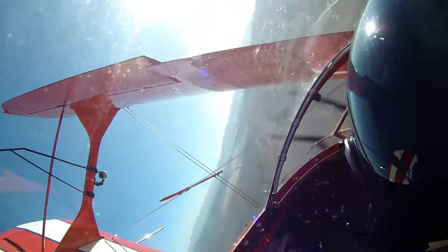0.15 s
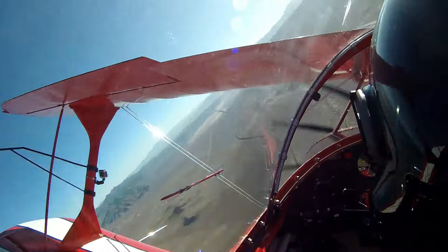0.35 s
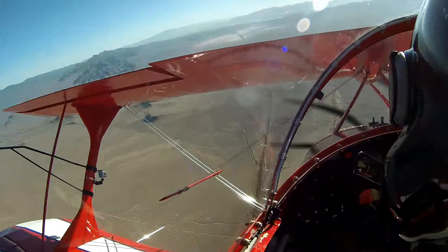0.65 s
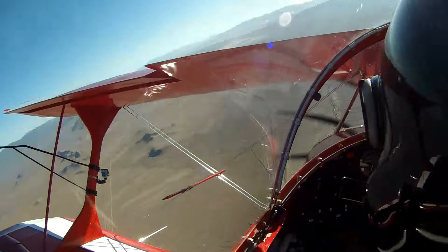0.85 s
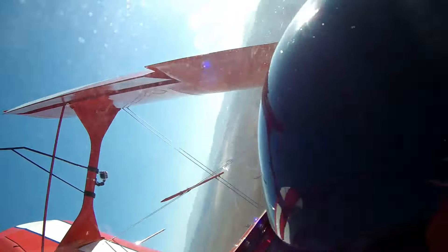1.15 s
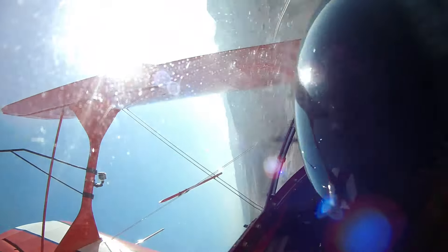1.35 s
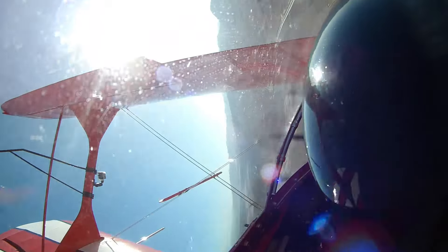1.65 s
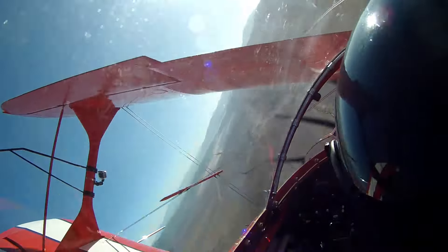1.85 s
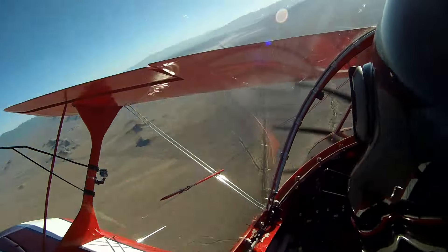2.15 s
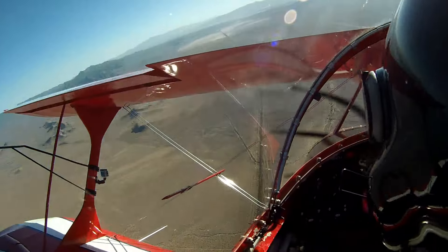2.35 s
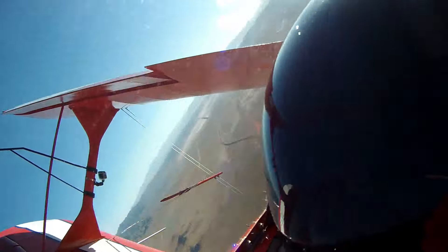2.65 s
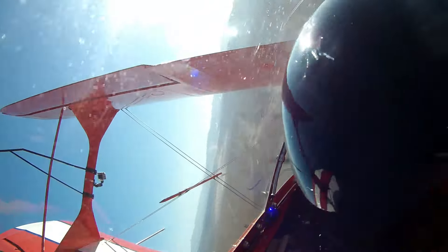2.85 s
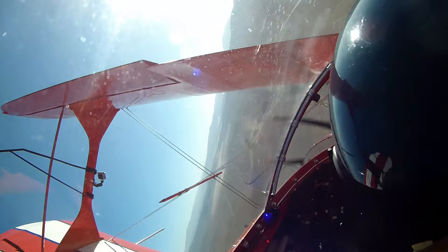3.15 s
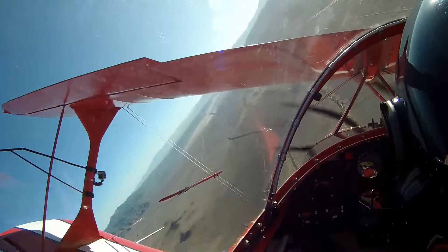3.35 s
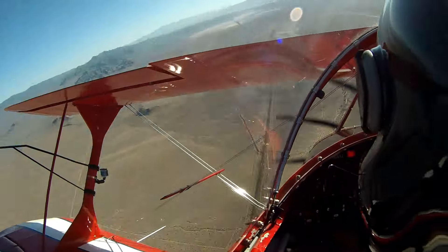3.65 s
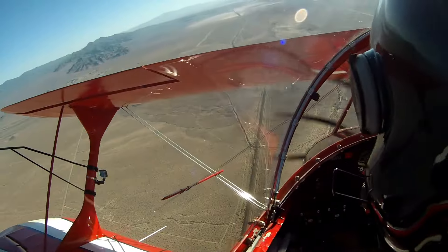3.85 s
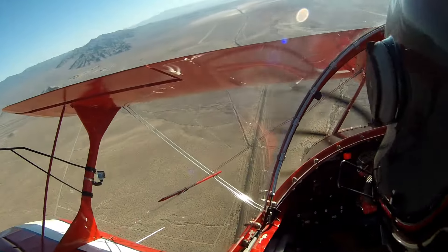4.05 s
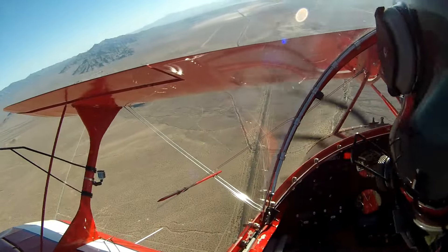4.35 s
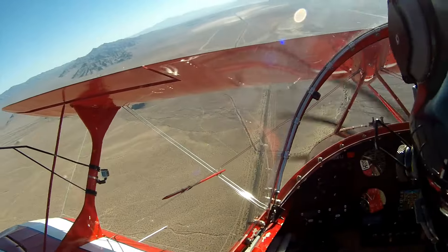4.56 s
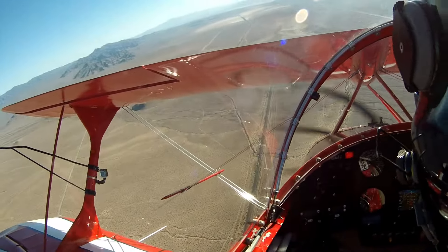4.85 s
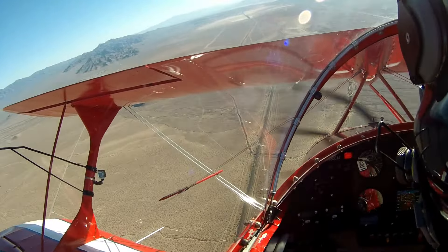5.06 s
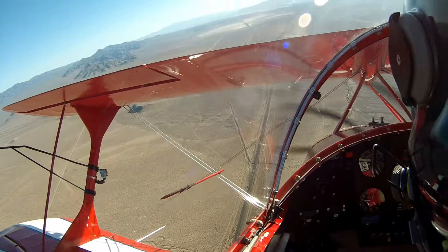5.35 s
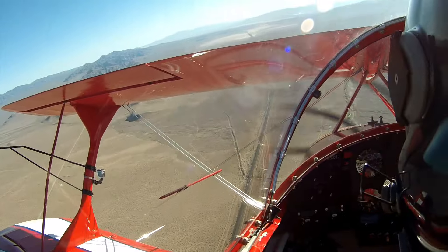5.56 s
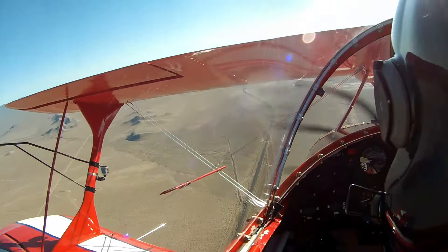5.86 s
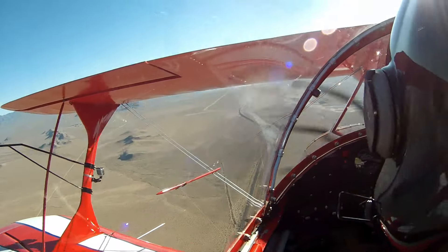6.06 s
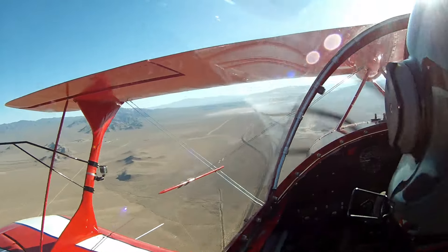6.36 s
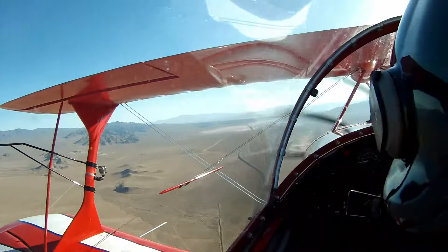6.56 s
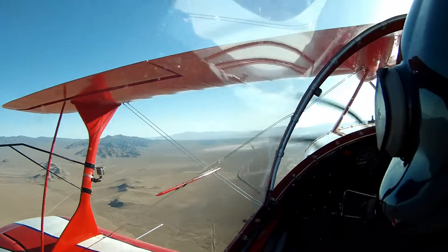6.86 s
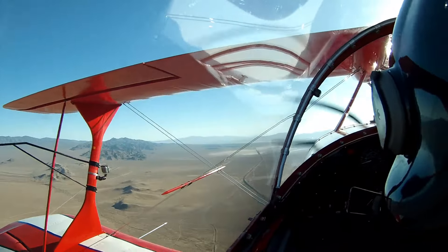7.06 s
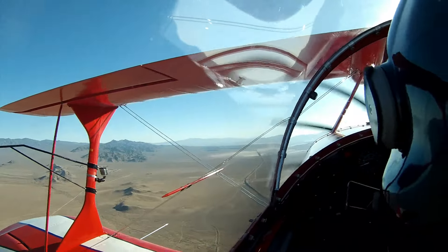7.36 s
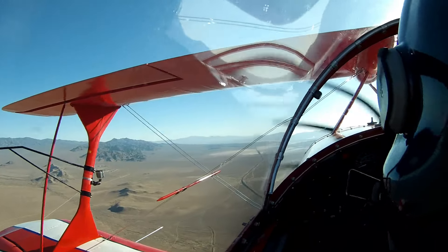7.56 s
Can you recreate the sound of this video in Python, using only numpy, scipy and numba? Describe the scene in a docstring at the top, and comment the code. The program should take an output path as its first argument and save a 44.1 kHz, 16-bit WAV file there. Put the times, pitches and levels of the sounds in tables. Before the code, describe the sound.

Cockpit of a small biplane in flight: a loud, low piston engine and propeller drone fills everything, its pitch swaying slightly during rolls, lifting briefly around four seconds, then settling steady. Wind buffets and roars over the canopy with faint hiss. The close onboard microphone is overloaded, making the sound gritty, thin in deep bass and pumping.

```python
"""In the cockpit of a small biplane: a six-cylinder engine and its propeller drone as a sum of shaft orders.
For four seconds the shaft speed swings with each roll; as the rolls end it rises briefly, then settles near 45
turns per second with another balance of orders. Throughout, coloured noise makes the slipstream that buffets the
canopy and hisses past its seals, with brief surges in all bands, as when an input's gain recovers. The input is
overdriven: its gain control pumps, the waveform clips, and a bass cut bends the flat tops into ramps."""
import sys
import numpy as np
from scipy import signal
from scipy.fft import rfft, irfft, next_fast_len
from scipy.io import wavfile
from scipy.ndimage import map_coordinates
from numba import njit

SR = 44100
rng = np.random.default_rng(int(sys.argv[2]) if len(sys.argv) > 2 else 0)


def to_wav(sig):
    """Store sig (one row per channel, or 1-D mono) as 16-bit WAV at the path in sys.argv[1].

    Samples outside -1..1 are clipped; the rate is SR.
    """
    pcm = np.clip(np.atleast_2d(sig), -1, 1) * 32767
    pcm = np.round(pcm).astype(np.int16)
    wavfile.write(sys.argv[1], SR, pcm.T)  # frames by channels


def how_loud(loudness_db):
    """Turn decibels into a plain amplitude multiplier (0 dB gives 1, 20 dB gives 10)."""
    steps = np.asarray(loudness_db, float) / 20
    return 10 ** steps


N = 340452

# shaft speed, swinging with each roll and rising briefly when the rolls end: time_s, speed_turns_per_s
SHAFT_SPEED = [(0.0, 45.55), (0.5, 45.3), (0.7, 44.68), (1.15, 44.68), (1.7, 45.72), (2.1, 45.3),
               (2.3, 44.85), (2.7, 44.8), (3.15, 45.52), (3.7, 45.08), (3.93, 45.15), (4.12, 46.45),
               (4.32, 46.6), (4.85, 44.95), (5.9, 45.0), (7.1, 44.78), (7.4, 44.96), (7.72, 44.96)]
REFERENCE_HZ = 45  # shaft speed from which deviations, faster or slower, are counted
# the balance of the orders and layers shifts around the end of the rolls
ROLLS_END_S, SHIFT_S = 4.0, 0.15
# shaft orders: order_per_turn, rolls_level_db, after_level_db,
# deviation_db_per_turn_per_s (after the rolls only), slow_waver_db
SHAFT_ORDERS = [(1, -33.5, -32, -2, 0), (2, -34.5, -33.5, 4.5, -0.5), (2.5, -43, -34.5, 1, 1.5),
                (3, -13.5, -14.5, -2.5, 0.53), (4, -30, -25.5, 3, 1), (4.5, -38.5, -36.5, 2, 1),
                (5, -29, -42, 2, 0.3), (6, -35, -23.5, -1.5, .6), (7, -44, -40, 2, -1),
                (9, -43.5, -41, -1, 0), (12, -50.5, -41, -5, 0)]

# swings of the air noise, before each layer takes its share: time_s, air_level_db, extra_roar_level_db
AIR_SWINGS = [(0, 0.93, 0.48), (0.3, -1.3, 0.79), (0.9, -0.63, 1.7), (1.6, -0.31, -1.9), (2.1, 0.4, 0.5),
              (2.55, 2.2, -0.11), (2.93, -1.2, -0.94), (3.4, 1.6, -0.89), (3.75, -0.71, 0.3),
              (4.45, 1.1, .8), (4.8, 0.4, 0.19), (5.4, -0.71, 0.42), (5.86, -0.18, .3), (6.2, 1.1, 0.16),
              (6.66, -0.48, 0.74), (7.19, -0.025, 0.41), (7.45, 1.2, .6), (7.72, 0.2, 0.93)]
# brief surges of the noise in all bands, as when an input's gain recovers, before each layer takes its share:
# centre_s, rise_db
NOISE_SURGES = [(0.149, 7), (0.299, 5), (.39, 5.5), (.88, 4.5), (1.28, 2), (2.38, 4.5), (2.45, 2.5),
                (5.65, 4), (6.21, 3.5), (7.14, 3), (7.46, 5)]
# relative spectrum of the low buffeting: frequency_hz, density_db_per_hz
BUFFET_SPECTRUM = [(15, -7), (28, -9.5), (45, -1), (75, -4), (115, -5.5), (160, -13.5), (210, -9.5),
                   (290, -11.5), (400, -54)]
# relative spectrum of the airframe's roar: frequency_hz, density_db_per_hz
ROAR_SPECTRUM = [(150, 13.5), (220, -2.5), (290, -3.5), (370, 0.5), (520, -3), (630, -5.5), (720, -14),
                 (860, -13), (1000, -28), (1500, -51)]
# relative spectrum of the rush over the canopy: frequency_hz, density_db_per_hz
RUSH_SPECTRUM = [(600, 4), (1000, 2.5), (1500, 1.5), (2400, 1), (3000, -4), (3500, -9.5), (4300, -17.5),
                 (5400, -28.5), (7000, -44)]
# relative spectrum of the hiss at the seals: frequency_hz, density_db_per_hz
HISS_SPECTRUM = [(3500, -20), (5100, -14.5), (6100, -9), (6600, 0), (8200, -7), (10000, -3.5), (11100, -6),
                 (11600, -4), (12600, -8.5), (14200, 0), (15200, -3.5), (16500, -21)]
# buffet, roar, rush, hiss in turn: rolls_level_db, after_level_db, swing_share (factor), own_gust_db,
# flutter_db, flutter_knots_per_s, surge_share (factor)
AIR_LAYERS = [(-19, -20.5, .4, .5, 0.5, 14, 0.22), (-24.5, -23.5, .9, 0.4, 0.33, 30, 1.13),
              (-35.5, -35, .75, 0.06, 0.2, 35, 0.81), (-45.5, -45, 0.66, 0.04, 0.24, 30, 0.86)]
GUST_KNOTS_PER_S = 3.5

CLIP_LEVEL, BASS_CUT_HZ, TOP_HZ = 0.555, 216, 15310


def engine():
    """Harmonic synthesis: orders locked to the shaft angle add up to a trough of pressure, each fluttering."""
    speed, = curves(SHAFT_SPEED)
    after = rolls_over()
    # firings are never quite even: the shaft angle wanders (radians)
    angle = 2 * np.pi * np.cumsum(speed) / SR + 0.02 * wobble(12)
    sound = 0
    # half orders occur because each cylinder fires every second turn
    for order, rolls_db, after_db, deviation_db, waver_db in SHAFT_ORDERS:
        shift_db = after_db - rolls_db + deviation_db * (speed - REFERENCE_HZ)
        level_db = rolls_db + after * shift_db + waver_db * wobble(3) + 0.5 * wobble(9)
        phase = order * angle + order_drift(order)
        sound = sound - how_loud(level_db) * np.sqrt(2) * np.cos(phase)
    return sound


def order_drift(order):
    """Phase drift: all but the firing order arrive through shaking panels and wander against it (radians)."""
    if order == 3:  # six cylinders fire three times a turn
        return 0
    drift = 0.42 * wobble(9)
    if order == 5:
        drift = drift - np.pi / 2  # a quarter cycle out of step
    return drift


def slipstream():
    """Turbulence noise: buffeting, airframe roar, canopy rush and seal hiss, each fluttering in its own way."""
    air_db, roar_db = curves(AIR_SWINGS)
    time = np.arange(N) / SR
    surge_db = sum(rise_db * np.exp(-((time - centre) / 0.015) ** 2) for centre, rise_db in NOISE_SURGES)
    own_swings_db = (0, roar_db, 0, 0)
    spectra = (BUFFET_SPECTRUM, ROAR_SPECTRUM, RUSH_SPECTRUM, HISS_SPECTRUM)
    sound = 0
    for layer, spectrum, own_db in zip(AIR_LAYERS, spectra, own_swings_db):
        rolls_db, after_db, swing_share, gust_db, flutter_db, flutter_rate, surge_share = layer
        level_db = rolls_db + (after_db - rolls_db) * rolls_over()
        level_db = level_db + swing_share * air_db + surge_share * surge_db + own_db
        level_db = level_db + gust_db * wobble(GUST_KNOTS_PER_S) + flutter_db * wobble(flutter_rate)
        sound = sound + how_loud(level_db) * noise(spectrum)
    return sound


def noise(spectrum):
    """Spectral shaping: white noise filtered through (Hz, dB) points and scaled to an rms of 1."""
    size = next_fast_len(N + 8192)
    hz, db = np.transpose(spectrum)
    log_hz = np.log(np.fft.rfftfreq(size, 1 / SR) + 1)
    colour = how_loud(np.interp(log_hz, np.log(hz), db, left=-120))
    shaped = irfft(rfft(rng.standard_normal(size)) * colour, size)[:N]
    return shaped / shaped.std()


def rolls_over():
    """Logistic transition: near 0 during the rolls, near 1 in the steady flight after them."""
    return 1 / (1 + np.exp((ROLLS_END_S - np.arange(N) / SR) * 4 / SHIFT_S))


def wobble(rate):
    """Slow random modulation: a spline through random knots, rate knots a second."""
    knots = rng.standard_normal(int(N * rate / SR) + 4)
    return map_coordinates(knots, [np.arange(N) * rate / SR])


def curves(rows):
    """Linear interpolation in time: one value per sample for each column after the time."""
    seconds, *columns = np.transpose(rows)
    return [np.interp(np.arange(N) / SR, seconds, column) for column in columns]


def scene():
    """Superposition: the pressures of engine and slipstream add at the microphone."""
    return (engine() + slipstream())[None]


@njit
def gain_control(x, limit, fall, rise, follow):
    """Feedback limiting: the aim falls fast over the limit and creeps up otherwise; the gain lags behind."""
    out, aim, gain = np.empty_like(x), 1.0, 1.0
    for i in range(len(x)):
        out[i] = gain * x[i]
        aim *= fall if abs(out[i]) > limit else rise
        gain += follow * (aim - gain)
    return out


def band_limit(x):
    """A steep low-pass at the top of the band."""
    return signal.sosfilt(signal.butter(12, 16030, fs=SR, output="sos"), x)


def record(dry):
    """Overload: gain control, input clipping, a one-pole bass cut, a second clipping and a band limit."""
    fall_db_per_ms, rise_db_per_ms, lag_ms = -2.2, 0.19, 2.7
    per_ms = SR / 1000  # samples in a millisecond
    fall, rise = how_loud(fall_db_per_ms / per_ms), how_loud(rise_db_per_ms / per_ms)
    levelled = gain_control(dry[0], CLIP_LEVEL, fall, rise, 1 / (lag_ms * per_ms))
    clipped = np.clip(levelled, -CLIP_LEVEL, CLIP_LEVEL)
    # the bass cut follows the clipper, so a flat top decays smoothly towards zero
    pole = np.exp(-2 * np.pi * BASS_CUT_HZ / SR)
    ramped = signal.lfilter([1, -1], [1, -pole], clipped - clipped[0])
    ramped = np.clip(ramped, -0.5, 0.5)
    passband = np.fft.rfftfreq(N, 1 / SR) < TOP_HZ
    mix = irfft(rfft(ramped) * passband, N)
    return band_limit(mix[None])


dry = scene()
out = record(dry)
to_wav(out)
```